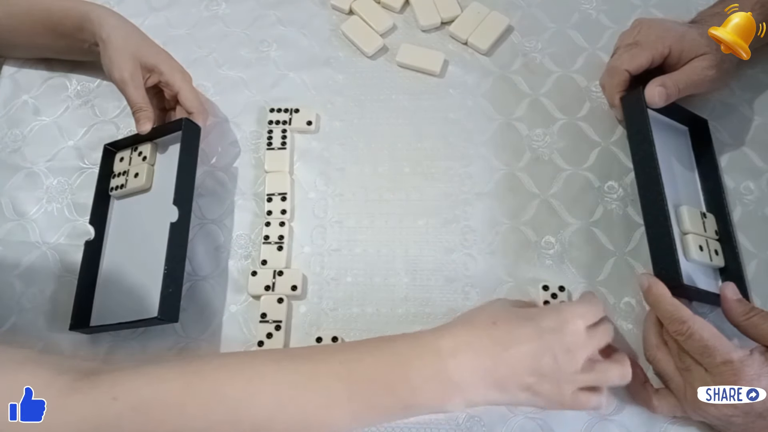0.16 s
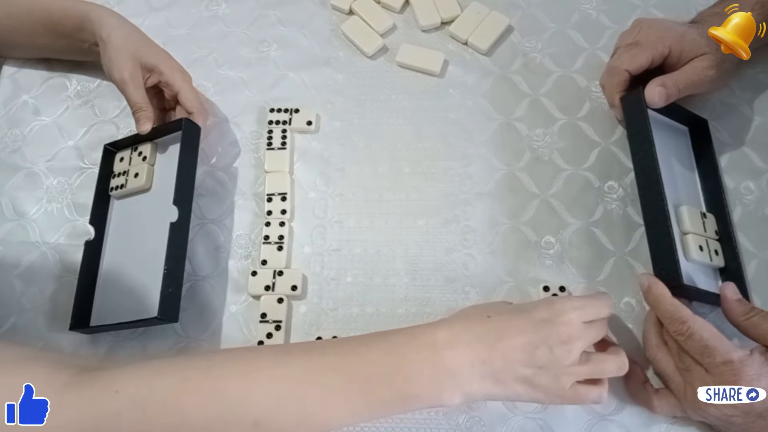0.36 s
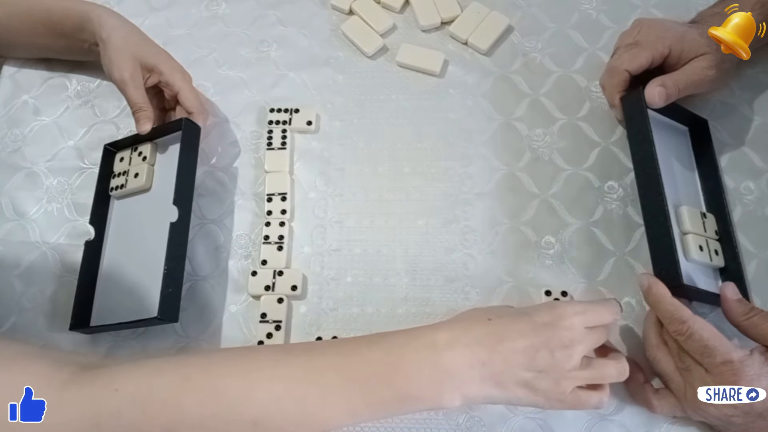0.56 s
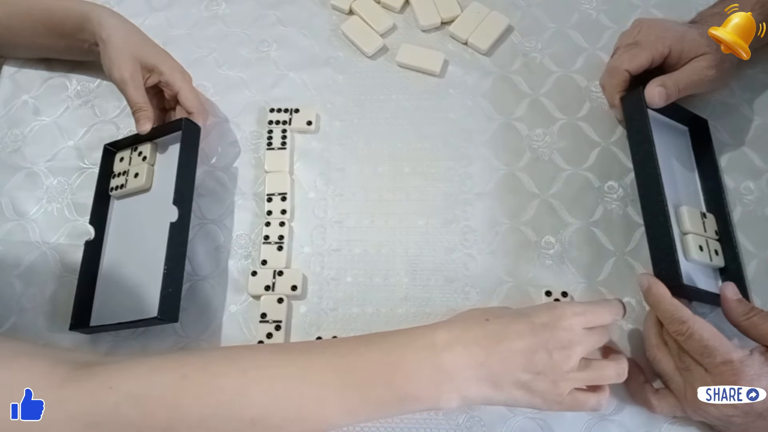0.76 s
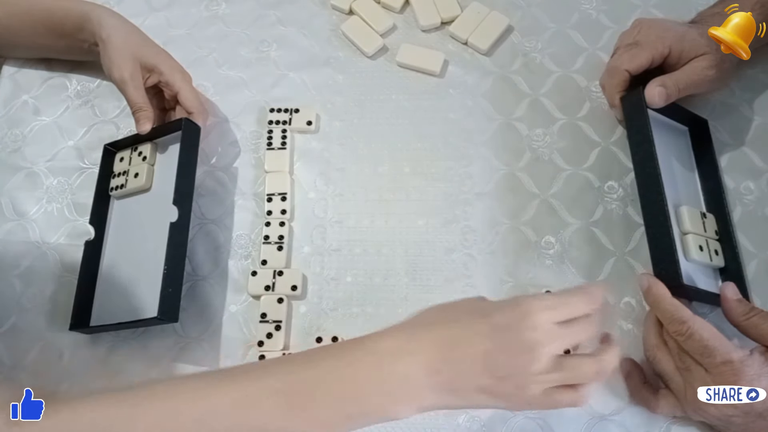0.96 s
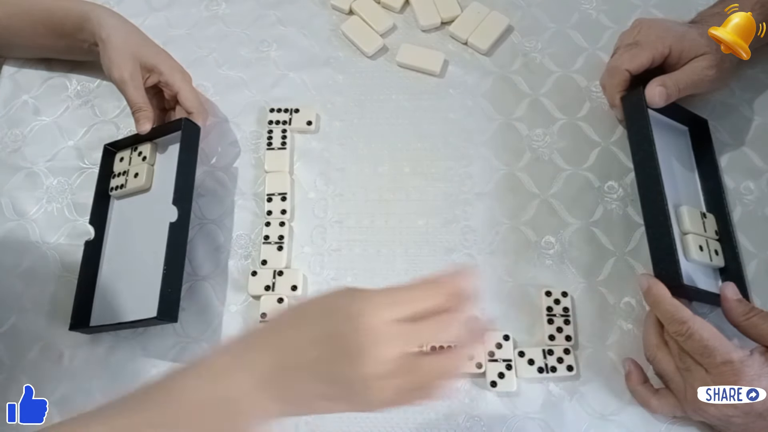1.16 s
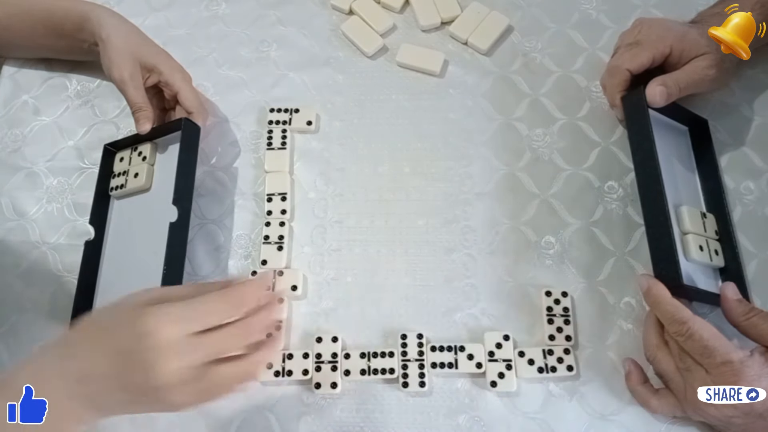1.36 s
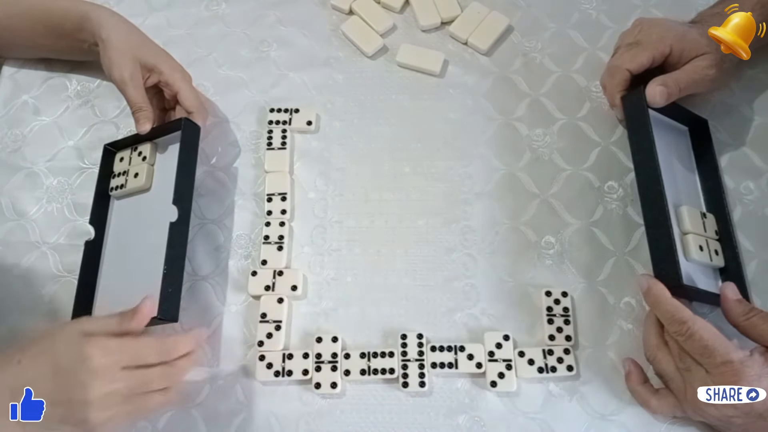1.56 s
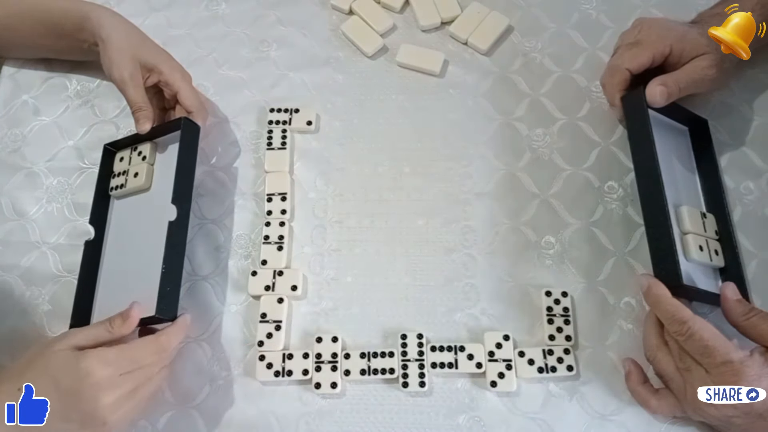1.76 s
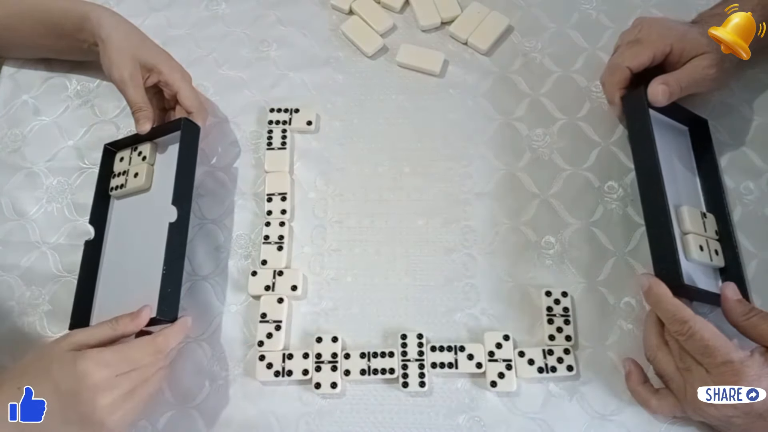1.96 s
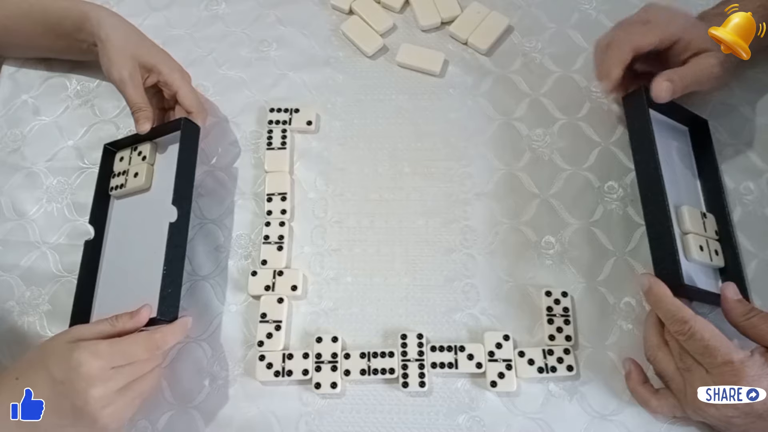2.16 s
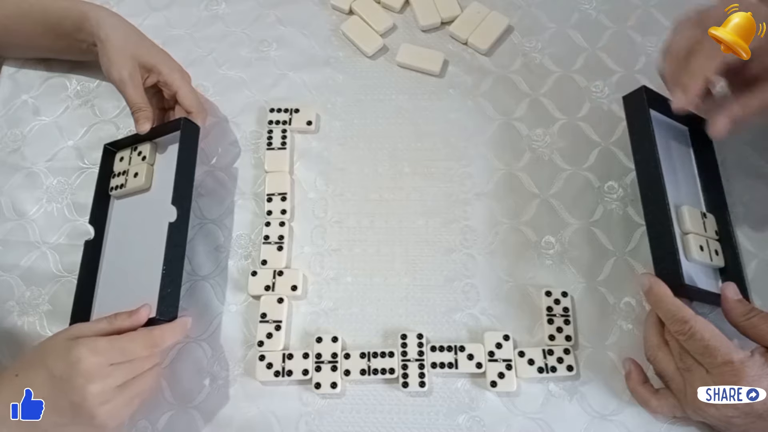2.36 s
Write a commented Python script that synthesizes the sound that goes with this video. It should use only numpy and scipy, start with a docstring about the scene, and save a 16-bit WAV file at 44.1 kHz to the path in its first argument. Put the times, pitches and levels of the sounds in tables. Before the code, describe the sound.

Close on a cloth-covered table, a hard tile bumps down and clacks once against another almost at once, with a short bright room echo; afterwards only very faint ticks, skin rubbing cloth, low rumble and recorder hiss.

```python
"""In a hard-walled room, a domino tile is set down on a cloth-covered table and pushed against its neighbour.
Soft thuds and small ticks lead to one sharp clack that rings out, then fainter ticks; hands brush the cloth.
Blows are impulses through steep resonances, with echoes and a noise tail; brushes are shaped noise.
Two close tones beat in a faint hum over low rumble and steady air noise.
The small microphone dips around 7-8 kHz and peaks near 9.5 kHz; the recorder adds hiss."""
import sys
import numpy as np
from scipy import signal
from scipy.fft import rfft, irfft, next_fast_len
from scipy.io import wavfile
from scipy.ndimage import uniform_filter1d, map_coordinates

SR = 44100
rng = np.random.default_rng(int(sys.argv[2]) if len(sys.argv) > 2 else 0)


def wav_record(signal):
    """Record a signal, one row per channel, as 16-bit PCM in the file named by sys.argv[1]."""
    frames = np.transpose(np.atleast_2d(signal))
    bounded = np.clip(frames, -1, 1)
    # unit amplitude maps onto the largest positive 16-bit level
    quanta = np.round(bounded * 32767).astype(np.int16)
    wavfile.write(sys.argv[1], SR, quanta)


N = 105840  # samples


def clack():
    """Tile strikes tile: blows too close to tell apart ring the tile and rattle its faces."""
    # Each row: start in seconds, peak level of the blow in dB.
    blows = [(.16703, -6), (.1679, -1), (.1687, -9)]
    # Tile resonances. Each row: centre in Hz, width in Hz, gain in dB.
    tile_modes = [(239, 300, -13), (510, 660, -11.5), (1550, 500, -9.5), (2300, 1100, -3.5),
                  (3117, 460, -2.5), (3850, 550, 4), (4250, 480, -1), (5125, 720, -11), (6500, 3400, -16),
                  (9500, 3400, -25)]
    total = np.zeros(N)
    for start_s, level_db in blows:
        blow = struck(level_db, tile_modes, cut_hz=9000) + chatter(level_db)
        total += placed(start_s, room(blow))
    return total


def thuds():
    """Tile edge lands on cloth: the soft contact low-passes the blow, the table top answers."""
    # Each row: start in seconds, peak level of the blow in dB, contact cut-off in Hz.
    landings = [(0.0113, -24, 2300), (.1497, -25.5, 3285)]
    # Table-top resonances. Each row: centre in Hz, width in Hz, gain in dB.
    table_modes = [(206, 380, 0), (600, 800, 4), (1000, 200, 0), (1440, 520, -0.5), (2000, 800, -2.5),
                   (2700, 430, -8)]
    return sum(placed(start_s, room(struck(level_db, table_modes, cut_hz)))
               for start_s, level_db, cut_hz in landings)


def ticks():
    """Small dry ticks of a tile corner: one high, short ring repeated at different levels."""
    # Each row: start in seconds, peak level of the blow in dB.
    taps = [(.0088, -37.5), (0.1355, -42), (.1496, -37.5), (.379, -51.5), (1.85, -59.5), (2.255, -55)]
    # Corner resonances. Each row: centre in Hz, width in Hz, gain in dB.
    corner_modes = [(3200, 1400, 5), (9300, 4100, -2.5), (14000, 3200, -2.5)]
    tick = room(struck(0, corner_modes, cut_hz=19000))
    return sum(amp(level_db) * placed(start_s, tick) for start_s, level_db in taps)


def struck(peak_db, modes, cut_hz):
    """One blow into a set of steep resonances, scaled to its peak level."""
    def gain(f):
        power = 0
        for centre_hz, width_hz, gain_db in modes:
            damping = (f * width_hz) ** 2
            resonance = damping / ((centre_hz * centre_hz - f * f) ** 2 + damping)
            power = power + amp(2 * gain_db) * resonance ** 2
        return np.sqrt(power)

    impulse = np.eye(1, SR // 10)[0]
    # the 10 Hz offset avoids zero gain at 0 Hz
    x = filtered(impulse, lambda f: dull(f, cut_hz) * causal(gain(f + 10)))
    return -amp(peak_db) * x / np.abs(x).max()


def chatter(blow_db):
    """Fine rattle of the faces after a blow: differenced, so bright, noise that dies fast."""
    below_blow_db, t60_s = -36, 0.03  # level before differencing
    t = np.arange(SR // 10) / SR
    bright = np.diff(rng.standard_normal(len(t) + 1))
    return amp(blow_db + below_blow_db - 60 * t / t60_s) * bright


def room(x):
    """Direct sound, first reflections, and a tail in which each frequency dies at its own speed."""
    # Reflections from table and near things. Each row: delay in seconds, level in dB.
    echoes = [(.0015, -13), (.0024, -8.5), (.0035, -5.5), (.0046, -7), (.0063, -12.5), (.009, -16.5)]
    # Main decay. Each row: frequency in Hz, t60 in seconds.
    tail_t60 = [(100, 0.8), (200, 0.64), (400, 0.34), (1000, 0.42), (2000, 0.35), (3000, .36), (4200, .3),
                (6000, .26), (8000, .2), (10000, .24), (15000, 0.068)]
    # Tail colour. Each row: frequency in Hz, gain in dB.
    tail_colour = [(60, -2), (110, 5), (150, 3), (250, -2.5), (500, 2.5), (1100, 1.5), (2000, 5.5),
                   (3000, 3), (4000, -6), (6000, -2), (10000, -2), (15000, 1)]
    echo_cut_hz = 3001
    tail_db, tail_rise_s = -1.5, 0.0031
    late_db, late_t60_ratio = -19, 2.2  # weaker, slower second decay

    def reflections(f):
        delayed = sum(amp(db) * np.exp(-2j * np.pi * f * delay_s) for delay_s, db in echoes)
        return dull(f, echo_cut_hz) * delayed

    early = filtered(x, reflections)
    hz, t, z = signal.stft(rng.standard_normal(SR), SR, nperseg=256)
    fall_db = -60 * t / along(tail_t60, hz)[:, None]
    decay = amp(fall_db) + amp(late_db + fall_db / late_t60_ratio)
    tail = signal.istft(z * decay, SR, nperseg=256)[1][:SR]
    tail = filtered(tail, lambda f: amp(along(tail_colour, f)))
    tail = tail * (1 - np.exp(-(np.arange(SR) / SR / tail_rise_s) ** 2))
    wet = amp(tail_db) * signal.fftconvolve(x, tail / np.linalg.norm(tail))
    return wet + np.pad(x + early, (0, SR - 1))


def brushes():
    """Skin brushing cloth: fine hiss rises fast with each stroke, a fuller swish swells slower."""
    # Each row: start in seconds, time from start to fall in seconds, fall t60 in seconds,
    # hiss level in dB, swish level in dB.
    strokes = [(0.059, .07, 0.18, -68, -85), (.19, .08, .2, -76, -69.5), (0.402, .055, .1, -70, -81),
               (.535, .025, .15, -83, -88), (1.644, .06, .5, -69.5, -74), (1.845, .015, .3, -78, -80),
               (2.166, .065, 0.25, -65, -67), (2.28, .04, .15, -83, -90), (2.35, .05, .2, -68, -77)]
    # Each row of both spectra: frequency in Hz, relative density in dB per Hz.
    hiss_spectrum = [(3000, -26.5), (4500, -12), (6000, -14), (8200, -6), (9600, 2), (12000, -0.5),
                     (15200, 1)]
    swish_spectrum = [(700, -26), (1200, -9), (1650, -2), (2100, -6), (3100, 1), (4200, -7), (6000, -9.5),
                      (8000, -30.5)]
    hiss_rise_s, swish_rise_s, grain_db = 0.008, 0.045, -0.5
    t = np.arange(N) / SR
    grain = unit(amp(grain_db * wobble(150)))
    hiss = noise(hiss_spectrum, patchy_db=2.5)
    swish = noise(swish_spectrum, patchy_db=1)
    total = np.zeros(N)
    for start_s, hold_s, t60_s, hiss_db, swish_db in strokes:
        since = t - start_s
        fall = amp(-60 * np.clip(since - hold_s, 0, 9) / t60_s)
        fine = amp(hiss_db) * np.clip(since / hiss_rise_s, 0, 1) * hiss
        full = amp(swish_db) * np.clip(since / swish_rise_s, 0, 1) * swish
        total += fall * (fine + full)
    return grain * total


def hum():
    """Two close tones, each wavering slowly in level, beat against each other."""
    # Each row: frequency in Hz, mean peak level in dB.
    tones = [(147.8, -66.5), (153.1, -69)]
    in_step_s, waver_db = 2.26, 1
    t = np.arange(N) / SR
    return sum(amp(db + waver_db * wobble(1)) * np.cos(2 * np.pi * hz * (t - in_step_s))
               for hz, db in tones)


def rumble():
    """Low noise of uneven, fluttering level."""
    # Each row: frequency in Hz, relative density in dB per Hz.
    spectrum = [(20, -6), (30, -1), (50, 6), (70, 5.5), (110, -1), (175, 1.5), (225, 0.5), (280, -3.5),
                (400, -7), (700, -11), (1200, -24), (2000, -50.5)]
    # Each row: time in seconds, level before flutter in dB.
    levels = [(.6, -67), (.7, -69.5), (.85, -66.5), (1.0, -66.5), (1.2, -69), (1.4, -62.5), (1.55, -64.5),
              (1.7, -68), (1.9, -70.5), (2.1, -66.5), (2.25, -67), (2.4, -67.5)]
    flutter_db = 1.5
    level_db = np.interp(np.arange(N) / SR, *np.transpose(levels))
    return amp(level_db + flutter_db * wobble(27)) * noise(spectrum, patchy_db=1.5)


def air():
    """Steady air noise of the room."""
    # Each row: frequency in Hz, relative density in dB per Hz.
    spectrum = [(500, -9.5), (1000, -2), (1450, -7), (2000, -2.5), (2800, 0), (3500, -1.5), (4300, -8.5),
                (6000, -14.5), (9000, -23.5)]
    return amp(-76) * noise(spectrum, patchy_db=0.9)


def amp(db):
    """dB to gain."""
    return 10 ** (np.asarray(db) / 20)


def unit(x):
    """Scaled to rms 1."""
    return x / np.sqrt(np.mean(x ** 2) + 1e-20)


def along(points, hz):
    """(Hz, value) points interpolated on a log frequency axis."""
    f, v = np.transpose(points)
    return np.interp(np.log(hz + 1), np.log(f + 1), v)


def wobble(knots_per_s):
    """A smooth random curve through random knots."""
    knots = rng.standard_normal(int(N * knots_per_s / SR) + 4)
    return map_coordinates(knots, [np.arange(N) * knots_per_s / SR])


def filtered(x, response):
    """x times a complex response of frequency."""
    m = 2 * next_fast_len(len(x) // 2 + 4096)
    return irfft(rfft(x, m) * response(np.fft.rfftfreq(m, 1 / SR)), m)[:len(x)]


def noise(spectrum, patchy_db):
    """Coloured noise of rms 1 with time-frequency patches of random gain."""
    z = signal.stft(rng.standard_normal(N), nperseg=1024)[2]
    field = uniform_filter1d(rng.standard_normal(z.shape), 5, 0)
    field = uniform_filter1d(field, 6, 1)
    x = signal.istft(z * amp(patchy_db * unit(field)), nperseg=1024)[1][:N]
    return unit(filtered(x, lambda hz: amp(along(spectrum, hz))))


def dull(f, cut_hz):
    """A steep causal low-pass: two equal second-order stages."""
    return 1 / (1 + np.sqrt(2) * 1j * f / cut_hz - (f / cut_hz) ** 2) ** 2


def causal(gain):
    """Minimum-phase response with the given gain on an FFT grid, by folding the cepstrum."""
    cep = irfft(np.log(gain + 1e-7))
    cep[1:len(cep) // 2] *= 2
    cep[len(cep) // 2 + 1:] = 0
    return np.exp(rfft(cep))


def placed(start_s, x):
    """A short sound at its start time in the scene."""
    return np.pad(x, (round(start_s * SR), N))[:N]


def scene():
    """All sources at one microphone."""
    tiles = clack() + thuds() + ticks()
    background = hum() + rumble() + air()
    return (tiles + brushes() + background)[None]


def record(dry):
    """Microphone colour, the recorder's own hiss, then a sharp band limit."""
    # Microphone response. Each row: frequency in Hz, gain in dB.
    mic = [(20, -29.5), (50, -10), (110, 1), (4300, 1.5), (5300, -4), (7000, -11), (8200, -13), (9500, -2),
           (10800, -10), (12500, -16), (15500, -21)]
    # Recorder hiss. Each row: frequency in Hz, relative density in dB per Hz.
    self_noise = [(3000, -1), (6000, -0.5), (9500, 1), (15200, -6)]
    self_noise_db, top_hz = -89.5, 15500
    x = filtered(dry[0], lambda hz: causal(amp(along(mic, hz))))
    x = x + amp(self_noise_db) * noise(self_noise, patchy_db=1.5)
    return filtered(x, lambda hz: hz < top_hz)[None]


dry = scene()
out = record(dry)
wav_record(out)
```